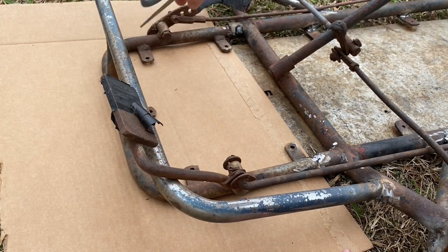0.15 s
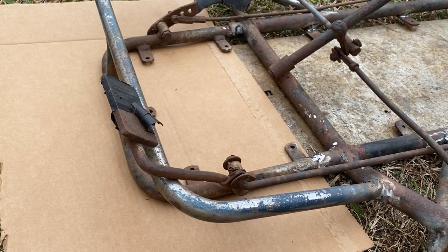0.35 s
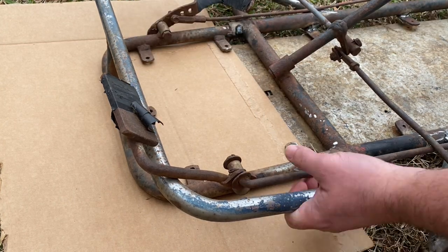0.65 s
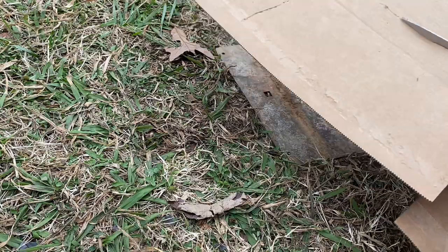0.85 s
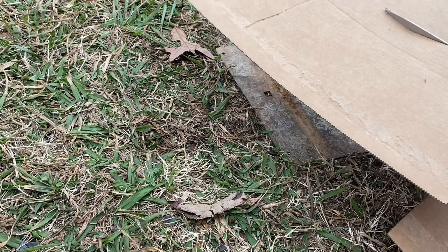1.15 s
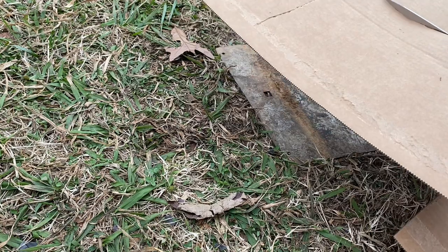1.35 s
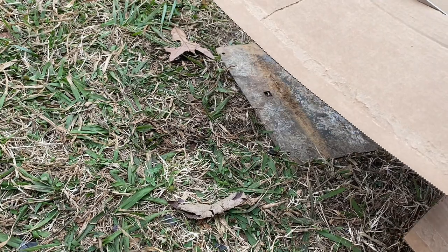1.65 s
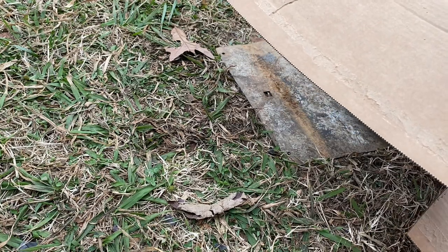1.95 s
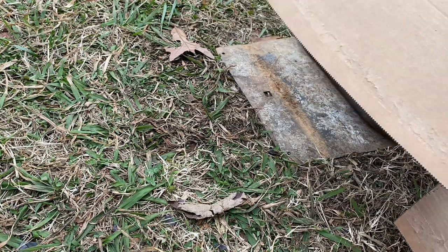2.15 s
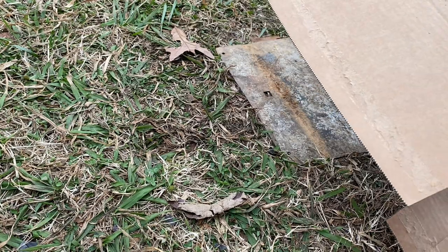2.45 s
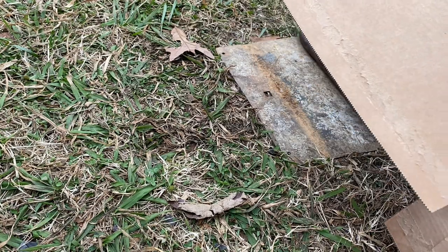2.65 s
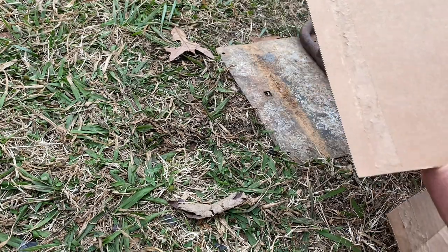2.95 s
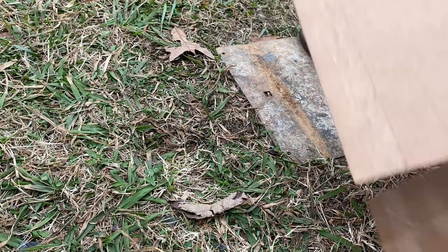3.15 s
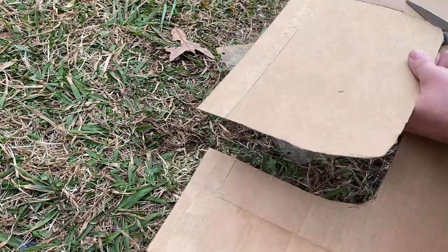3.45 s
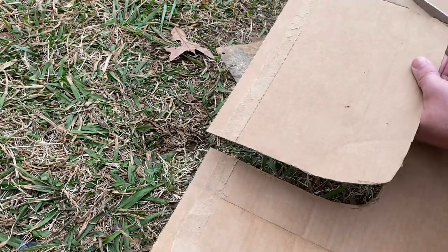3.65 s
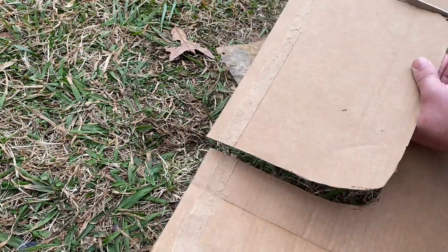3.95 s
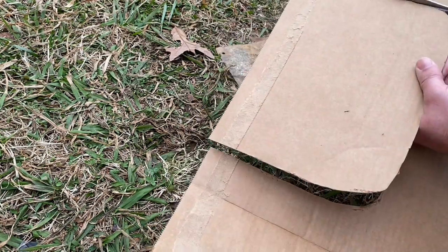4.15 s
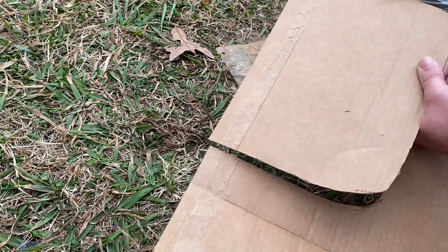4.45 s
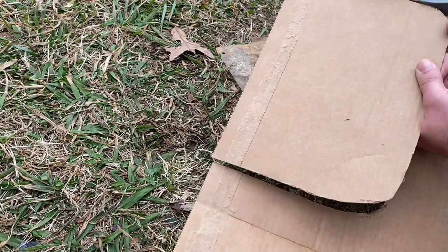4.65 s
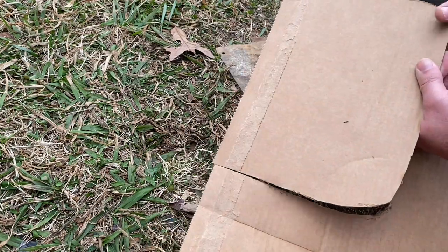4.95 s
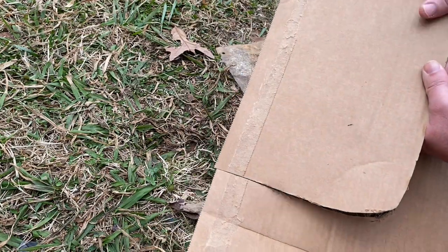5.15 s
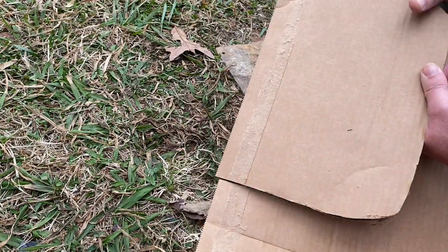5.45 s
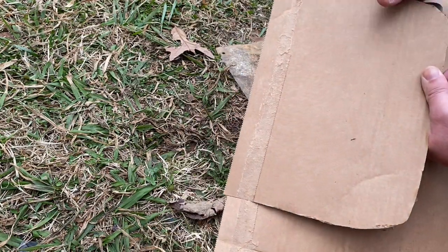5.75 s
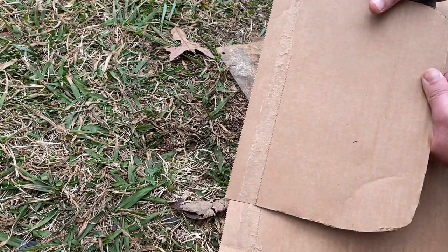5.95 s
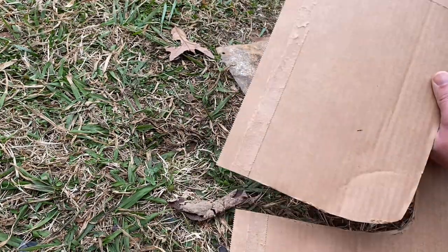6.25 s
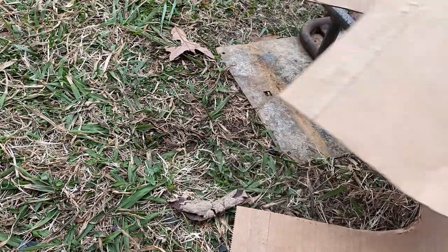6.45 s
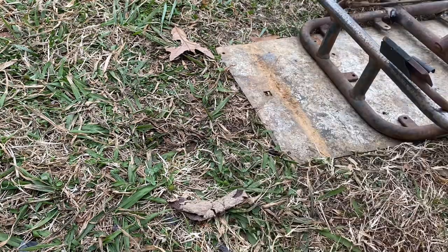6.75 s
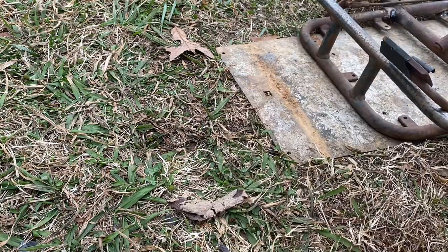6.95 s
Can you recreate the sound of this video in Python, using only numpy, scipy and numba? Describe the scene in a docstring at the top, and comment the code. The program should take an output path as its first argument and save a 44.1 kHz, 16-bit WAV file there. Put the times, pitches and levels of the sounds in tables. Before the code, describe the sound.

A close, dry stereo sound outdoors, with quiet air and a faint, wavering low hum that swells around 5.5 seconds. At the start a light scrape of steel on paper and a few thin, bright snaps, then dull handling thuds from 0.2 to 0.4. From about 0.8 the snips bite into corrugated cardboard: a strong crack cluster at 1.0, then sparser pops and fine blade ticks until 2.1. Between 2.25 and 3.6 the blades drag with short, dry rasps and scrapes, broken by firm cracks at 2.96 and 3.3. From 3.65 to 5.65 the crunches come in regular bursts, several pops per bite, louder and brighter, with papery sliding between. Weaker cracks at 5.9, then a last heavy, deeper crunch near 6.15. The sheet comes away with a brief scrape at 6.6 and soft low bumps from 6.75 to 7.1.

```python
"""A short slide of steel on paper and a faint hum in the outdoor air, a catch of the blade, then the first cracks:
scissors cut a sheet of corrugated cardboard outdoors, close to two microphone ports.
The flutes crack in short bursts, each a quick falling chirp that rings the strip under the blade.
Between bites the blades slide, tick and rasp in the slit as filtered random snaps and hiss,
and the held sheet flexes as a low noise and bumps in damped thuds."""
import sys
import numpy as np
from scipy import signal
from scipy.fft import rfft, irfft
from scipy.io import wavfile
from scipy.ndimage import uniform_filter1d
from numba import njit

SR = 44100
rng = np.random.default_rng(int(sys.argv[2]) if len(sys.argv) > 2 else 0)


def transcribe(signal):
    """Save signal, clipped to [-1, 1], as a 16-bit WAV file at the path in sys.argv[1]."""
    frames = np.atleast_2d(signal).T
    limited = np.clip(frames, -1, 1)
    pcm = np.round(limited * 32767).astype(np.int16)
    wavfile.write(sys.argv[1], SR, pcm)


N = 313418
HIT_SIZE = 4096  # samples in one short impact
# the strip of sheet under the blade rings with a main mode and a partner above it
STRIP_Q, PARTNER_RATIO = 14, 1.42


def undb(db):
    """Decibels to gain."""
    return 10 ** (np.asarray(db) / 20)


def curve(rows, axis=1):
    """One column of a timed table, at every sample."""
    rows = np.array(rows)
    return np.interp(np.arange(N) / SR, rows[:, 0], rows[:, axis])


def bins(size):
    """Frequencies of a spectrum in Hz, kept above zero."""
    return np.maximum(np.fft.rfftfreq(size, 1 / SR), 1)


def across(rows, hz, axis=1):
    """One column of a frequency table, joined on a log axis."""
    rows = np.array(rows)
    return np.interp(np.log(hz), np.log(rows[:, 0]), rows[:, axis])


def paint(x, colour):
    """Give a sound a colour of (Hz, dB) points, without shifting its phase."""
    size = x.shape[-1]
    return irfft(rfft(x) * undb(across(colour, bins(size))), size)


def resonance(hz, centre_hz, q):
    """Response of one damped mode."""
    return 1 / (1 + 1j * q * (hz / centre_hz - centre_hz / hz))


def unit(x, seconds=N / SR):
    """Scale a sound to the energy of rms 1 held for so long."""
    return x * np.sqrt(seconds * SR / np.sum(x ** 2))


def walk(rate):
    """Smooth random wandering with a spread near 1, from `rate` random steps a second."""
    step = max(int(SR / rate), 1)
    stairs = np.repeat(rng.standard_normal(N // step + 1), step)
    smooth = uniform_filter1d(uniform_filter1d(stairs, step), step)
    return 1.895 * smooth[:N]


def add(track, s, sound):
    """Mix a short sound in at a given time."""
    i = max(int(s * SR), 0)
    track[i:i + len(sound)] += sound[:N - i]


def gestures(rows, attack_s, release_s, sag_db):
    """Gain of movements: each rises, holds while its level sags by sag_db, and dies away; powers add."""
    power = np.zeros(N)
    for s, length_s, db in rows:
        size = int((attack_s + length_s + 8 * release_s) * SR)
        t = np.arange(size) / SR - attack_s
        rise = np.clip(1 + t / attack_s, 0, 1) ** 2
        hold = undb(db - sag_db * np.clip(t / length_s, 0, 1))
        fall = np.exp(-np.maximum(t - length_s, 0) / release_s)
        add(power, s - attack_s, (rise * hold * fall) ** 2)
    return np.sqrt(power)


def bending(hz, lag_s):
    """Bending waves are slower when low: the delay is lag_s at 1 kHz and goes as 1 / sqrt(f)."""
    return np.exp(-4j * np.pi * lag_s * np.sqrt(hz * 10 ** 3))


def strip(hz, ring_hz, wide_q=1.83, broad=0.3, sustain=3.6, partner=0.23):
    """The strip under the blade: a broad knock, and a narrow mode with its partner that ring on for a moment."""
    main_mode = resonance(hz, ring_hz, STRIP_Q)
    partner_mode = partner * resonance(hz, PARTNER_RATIO * ring_hz, STRIP_Q)
    knock = broad + resonance(hz, ring_hz, wide_q)
    return knock + sustain * (main_mode + partner_mode)


@njit
def moving_band(x, hz, q):
    """A resonance whose centre moves every sample."""
    y, band, low = np.empty(len(x)), 0., 0.
    for i in range(len(x)):
        g = np.tan(np.pi * hz[i] / SR)
        v = (band + g * (x[i] - low)) / (1 + g * (g + 1 / q))
        band, low, y[i] = 2 * v - band, low + 2 * g * v, v / q
    return y


# Colour of the open air around the ports. Each row: frequency in Hz, relative level in dB.
AIR_COLOUR = [(25, -49.5), (70, -33), (130, -15), (250, 9), (900, -8.5), (3200, -22.5), (8000, -29.5),
              (15500, -30)]


def air(level_db=-57, spread=0.47):
    """Quiet outdoor noise whose level wanders, slightly different at each port."""
    mid, side = (unit(paint(rng.standard_normal(N), AIR_COLOUR)) for _ in range(2))
    return undb(level_db + walk(13.0)) * (mid + spread * side * np.array([[1], [-1]]))


# Distant hum, before its random wavering. Each row: time in seconds, pitch in Hz, level in dB.
HUM = [(0, 279, -71), (1.4, 273.8, -54), (3.6, 281, -67), (4.4, 276, -54), (5.25, 281.9, -55.5),
       (5.45, 284, -45), (5.8, 283.5, -44.5), (6, 285, -57)]


def hum():
    """A distant hum, one sine that swells and wavers in pitch."""
    waver, swell_db = .008, 2.3  # pitch spread as a fraction, level spread
    pitch_hz = curve(HUM) * (1 + waver * walk(15))
    phase = 2 * np.pi * np.cumsum(pitch_hz) / SR
    return unit(np.sin(phase)) * undb(curve(HUM, axis=2) + swell_db * walk(9.3))


# Strokes of steel and paper sliding over the sheet.
# Each row: start in seconds, length in seconds, effort in dB before the gain of each sound it drives.
BLADE_STROKES = [(0, 0.15, -50.5), (.658, .012, -44), (1.455, 0.074, -52.5), (1.74, 0.035, -47),
                 (2.145, 0.077, -49), (2.5, 0.14, -48.5), (2.63, 0.118, -44), (3.07, 0.11, -43),
                 (3.3, .028, -41), (3.378, 0.017, -35.5), (3.44, 0.11, -49), (3.505, 0.05, -41),
                 (3.59, 0.13, -47.5), (3.975, 0.062, -46), (4.28, 0.053, -49), (4.49, .17, -47.5),
                 (4.76, 0.092, -48.5), (4.88, 0.18, -48), (5.205, 0.049, -47), (5.47, 0.12, -48),
                 (5.705, 0.16, -50), (6.025, 0.074, -47), (6.338, 0.1, -63.5), (6.575, 0.02, -42.5)]
# Light rubbing while the blades sit in the slit.
# Each row: start in seconds, length in seconds, effort in dB before the same gains.
LIGHT_RUBBING = [(0.882, 5.38, -57.5)]
# a stroke takes hold quickly, slackens as it goes and lets go
STROKE_ATTACK_S, STROKE_RELEASE_S, STROKE_SAG_DB = 0.0088, 0.013, 2


def blade_effort():
    """How hard the blades rub: strokes over a light steady contact."""
    return gestures(BLADE_STROKES + LIGHT_RUBBING, STROKE_ATTACK_S, STROKE_RELEASE_S, STROKE_SAG_DB)


# Colour of the blades' rubbing. Each row: frequency in Hz, relative level in dB.
SLIDE_COLOUR = [(200, -6.5), (500, -1.5), (950, 8), (3600, 2.5), (5800, -2), (8200, -1.5), (11000, -7.5),
                (15500, -10.5)]


def sliding(gain_db=-3.0):
    """Paper fibres catch and let go under the blade: fibres of each size tick on their own, over a hiss."""
    grain_rate, grain_db = 570, 4.1  # ticks a second for each size, mean excess of a tick
    hiss, catch_db = 1.1, 3.9  # hiss against ticks, spread of the quick level changes
    rub = 0
    for fibre_hz in 10 ** 3 * 2. ** np.arange(5):  # 1 to 16 kHz in octaves
        moments = rng.random(N) < grain_rate / SR
        direction = np.sign(rng.standard_normal(N))
        ticks = moments * direction * undb(grain_db * np.minimum(rng.exponential(size=N), 4))
        friction = (unit(ticks) + hiss * rng.standard_normal(N)) * undb(2 * walk(40))
        rub = rub + signal.lfilter(*signal.iirpeak(fibre_hz, 2, fs=SR), friction)
    return unit(paint(rub, SLIDE_COLOUR)) * blade_effort() * undb(gain_db + catch_db * walk(90))


def crackle(level_db=-4):
    """Single fibre bundles snap at random and ring the sheet, harder when the blade slides harder."""
    rate, size_db, spurt_s = 110, 4, .0007  # snaps a second, mean excess of a snap, decay
    hz = bins(N)
    snaps = (rng.random(N) < rate / SR) * undb(size_db * np.minimum(rng.exponential(size=N), 3))
    # each snap is a spurt of splinters that decays in under a millisecond
    envelope = signal.lfilter([1], [1, -np.exp(-1 / (spurt_s * SR))], snaps)
    spurts = envelope * rng.standard_normal(N)
    sheet = strip(hz, 1590) * bending(hz, 0.001498)
    return undb(level_db) * blade_effort() * unit(irfft(rfft(spurts) * sheet, N))


# The blade catching on the cut edge, once or in a run of fine ticks.
# Each row: start in seconds, length of the run in seconds (0 for one tick), typical level of a tick in dB.
CATCHES = [(.016, 0, -29.5), (1.165, 0.01, -33.5), (.941, 0, -37.5), (1.389, 0, -35), (1.514, 0, -28),
           (1.572, 0.064, -35), (1.872, .11, -39.5), (1.991, 0.012, -31.5), (2.188, 0, -39),
           (3.8348, 0, -33.5), (6.022, 0, -29.5), (6.132, 0, -26.5)]


def catches(ring_hz=1550, bright_hz=3200, lag_s=0.0018):
    """The blade catches and jumps at an uneven, slowing pace; each jump crushes a few fibres and rings the strip."""
    gap_s, slowing, scatter = .006, .05, .45  # first gap, its growth with elapsed time, log spread
    grit, grit_s = .4, .0013  # crushed fibres: amount, decay
    out, t, hz = np.zeros(N), np.arange(HIT_SIZE) / SR, bins(HIT_SIZE)
    for (s, length_s, db), chance in zip(CATCHES, rng.standard_normal((len(CATCHES), 20, 3))):
        elapsed = 0
        for pace, size, pitch in np.exp(scatter * chance):
            if elapsed <= abs(length_s):
                body = .5 + strip(hz, ring_hz * pitch ** .5)
                # dull above bright_hz and thin below 500 Hz
                body = body / (1 + 1j * hz / bright_hz) / (1 + 500 / (1j * hz))
                fibres = grit * rng.standard_normal(HIT_SIZE) * np.exp(-t / grit_s)
                push = rfft((t == 0) + fibres)
                tick = unit(irfft(push * body * bending(hz, lag_s)), 0.001)
                add(out, s + elapsed, undb(db) * size ** .5 * tick)
                elapsed += (gap_s + slowing * elapsed) * pace
    return out


# Colour of the sheet's ring. Each row: frequency in Hz, relative level in dB.
SHEET_COLOUR = [(40, -76.5), (120, -19), (250, 9.5), (1000, 8), (2200, 6), (3200, 0), (5000, -5.5),
                (9000, -13.5)]
# Colour of the snap through the air. Each row: frequency in Hz, relative level in dB.
SNAP_COLOUR = [(100, -48), (1500, -24), (3000, 2), (4600, -0.5), (7700, -2.5), (9500, -7.5), (15500, -17)]
# Flutes of the sheet cracking close to the ports, alone or several to a bite.
# Each row: time in seconds, ring level in dB, ring of the strip in Hz, treble snap relative to the ring in dB.
FLUTE_CRACKS = [(0.072, -30, 2770, 4), (0.099, -31, 3090, -5), (0.1091, -26, 3050, -6.5),
                (0.8373, -24, 1050, -13), (0.8653, -37, 1840, 3.5), (0.9877, -19.5, 1850, -14),
                (0.9976, -16, 1770, -13), (1.0104, -24, 1700, 1), (1.1949, -28, 1870, -0.2),
                (1.1983, -22.5, 1770, -16), (1.359, -22.5, 1880, -3), (1.6424, -27, 1360, -3),
                (1.6555, -29.5, 1144, 2.5), (1.682, -26.5, 1250, 0), (1.8331, -27.5, 1280, -22),
                (2.0406, -22.5, 1360, -8), (2.5559, -27, 1220, -12), (2.5698, -30.5, 970, 4),
                (2.964, -20.5, 1100, 0.5), (3.3115, -19, 1420, -11.1), (3.636, -22, 1710, -3.5),
                (3.6692, -16, 1730, -12), (3.8562, -20, 2270, -3), (3.8797, -14, 2310, -1),
                (3.8886, -17.5, 1580, -2.5), (4.1149, -18, 1710, -9.8), (4.1273, -26, 1710, 0.5),
                (4.1526, -21, 1550, -3.5), (4.1959, -23, 1660, -2.5), (4.4312, -17.5, 1670, -8.5),
                (4.4401, -30, 890, -2), (4.6564, -19.5, 3000, -11), (4.6659, -17.5, 1720, -4.5),
                (4.6754, -17, 1930, -9), (4.6988, -14.5, 1620, -4), (4.9025, -16.5, 2100, -10),
                (4.9169, -22.5, 1640, -13), (4.9423, -18.5, 2130, -6.5), (5.1128, -26, 2260, -14),
                (5.1253, -16.5, 1760, -14.7), (5.1357, -13, 1800, -23), (5.1507, -18.5, 2330, -2),
                (5.162, -19, 2580, -1.2), (5.3886, -22, 2620, -6.1), (5.3984, -13, 2470, -4.5),
                (5.618, -18, 2200, -3), (5.6274, -17, 990, -3.8), (5.6316, -22.5, 2180, 0.5),
                (5.897, -23.5, 2230, -10.5), (5.9052, -25, 2065, -12), (6.1459, -14, 1657, -21),
                (6.1526, -18.6, 1600, -12), (6.166, -11.5, 758, -21), (6.6562, -32.5, 970, -19),
                (6.8432, -33, 710, -13.5), (7.0344, -44, 710, -34)]


def cracks(echo=0.058, echo_s=0.0049, echo_hz=900, snap_db=0, lag_s=0.002115, bounce=0.42):
    """Each flute gives way in a spurt of fibre snaps and its liner follows a moment later, weaker;
    the strip rings and the sheet's edges send the low waves back."""
    tear_s, tear, snap_s = .0004, .15, .00045
    bounce_s, span_s = .0028, .002  # typical edge delay, span over which levels are set
    liner_db, liner_s = -10, .004  # typical strength and delay of the liner
    out, t, hz = np.zeros(N), np.arange(HIT_SIZE) / SR, bins(HIT_SIZE)
    sheet = undb(across(SHEET_COLOUR, hz)) * bending(hz, lag_s)
    noises = rng.standard_normal((len(FLUTE_CRACKS), 4, HIT_SIZE))
    for (s, db, ring_hz, treble_db), (fibres, edges, splinters, place) in zip(FLUTE_CRACKS, noises):
        edge_distance, spurt_length, liner_size, liner_lag = np.exp(place[:4] / 2)
        liner = undb(liner_db) * liner_size * np.exp(-2j * np.pi * hz * liner_s * liner_lag)
        twice = 1 + liner
        push = twice * rfft((t == 0) + tear * fibres * np.exp(-t / tear_s))
        # the nearest edge lies at another distance for every flute, so each crack has its own comb
        comb = 1 - bounce * np.exp(-2j * np.pi * hz * bounce_s * edge_distance)
        scatter = echo * edges * np.exp(-t / echo_s) * (1 - np.exp(-t / bounce_s))
        returns = rfft(scatter) / (1 + 1j * hz / echo_hz)
        ring = irfft(sheet * (push * comb * strip(hz, ring_hz) + 2 * returns))
        # the treble snap comes straight through the air, ahead of the ring
        fall = np.exp(-t / (snap_s * np.sqrt(spurt_length)))
        spurt = irfft(twice * rfft(fall * (1 - fall)))
        snap = paint(np.roll(splinters * spurt, shift=HIT_SIZE // 2), SNAP_COLOUR)
        add(out, s - .0013, undb(db) * unit(ring, span_s))
        snap_start = s - snap_s - HIT_SIZE / 2 / SR  # the snap sits mid-buffer
        add(out, snap_start, undb(db + treble_db + snap_db) * unit(snap, span_s))
    return out


# Colour of the flexing rumble. Each row: frequency in Hz, relative level in dB.
FLEX_COLOUR = [(30, -48), (70, -36), (160, -3.5), (250, 1.5), (800, -14), (2500, -42), (8000, -70)]
# The sheet bent in the hand. Each row: start in seconds, length in seconds, effort in dB before the gain.
BENDS = [(.2, 0.14, -46.5), (.7, 0.15, -49.5), (3.11, 0.086, -47), (5.3, 1.04, -52.5), (6.77, 0.069, -47),
         (7.01, 0.055, -41.5)]
# The sheet just held up. Each row: start in seconds, length in seconds, effort in dB before the gain.
HELD_UP = [(0.674, 1.738, -51.5), (2.85, 3.95, -52)]
BEND_ATTACK_S, BEND_RELEASE_S, BEND_SAG_DB = 0.12, 0.074, -0.5  # negative sag: the effort grows


def flexing(gain_db=-1.0, creak_db=-13, easy_db=-50):
    """The held sheet rumbles; when bent harder it also creaks higher up."""
    flutter_db, creak_growth = 2.5, .7  # spread of the rumble's level, extra power law of the creak
    effort = gestures(BENDS + HELD_UP, BEND_ATTACK_S, BEND_RELEASE_S, BEND_SAG_DB)
    rumble = unit(paint(rng.standard_normal(N), FLEX_COLOUR)) * undb(flutter_db * walk(45))
    slips = (rng.random(N) < 400 / SR) * rng.standard_normal(N)  # about 400 a second
    creak = unit(irfft(rfft(slips) * resonance(bins(N), 488, 1.1) ** 2, N))
    creak = creak * undb(creak_db) * (effort / undb(easy_db)) ** creak_growth
    return effort * undb(gain_db) * (rumble + creak)


# Dull handling bumps on the sheet. Each row: time in seconds, level in dB, centre of the thud's mode in Hz.
HANDLING_BUMPS = [(.223, -31, 505), (.283, -22.5, 474), (.308, -27, 435), (.343, -33, 440),
                  (0.375, -34.5, 450), (.412, -30, 623), (.544, -42, 520), (.698, -35, 383),
                  (0.8, -36.5, 790), (1.293, -35.5, 263), (1.799, -32.5, 306), (2.332, -34.5, 237),
                  (2.603, -39, 450), (2.797, -41, 380), (3.759, -44, 185), (4.127, -30, 300),
                  (5.237, -38.5, 244), (6.22, -37, 435), (6.263, -38, 263), (6.298, -36.5, 312),
                  (6.338, -43, 290), (6.76, -29, 314), (6.786, -29.5, 238), (6.821, -32, 214),
                  (6.842, -28.5, 270), (6.966, -40, 432), (7.018, -34, 600), (7.064, -30.5, 600),
                  (7.081, -27.5, 620)]


def bumps(lag_s=.0022, q=1.5, scuff=.14, scuff_s=.0055, softness=3.52):
    """Soft contacts push the whole sheet: a low, quickly damped thud with a little scuffing."""
    out, t, hz = np.zeros(N), np.arange(HIT_SIZE) / SR, bins(HIT_SIZE)
    sheet = bending(hz, lag_s) / (1 + (150 / hz) ** 4)
    grits = rng.standard_normal((len(HANDLING_BUMPS), HIT_SIZE))
    for (s, db, centre_hz), grit in zip(HANDLING_BUMPS, grits):
        contact = (t == 0) + scuff * grit * np.exp(-t / scuff_s)
        # a longer, softer push is both lower and duller
        push = rfft(contact) / (1 + (hz / centre_hz / softness) ** 4)
        thud = irfft(push * sheet * resonance(hz, centre_hz, q))
        add(out, s - .002, undb(db) * unit(thud, 0.008))
    return out


# Rasps of the blades dragging in the slit. Each row: start in seconds, length in seconds,
# level in dB before the gain, middle resonance of the strip in Hz, its partner's relative level in dB.
RASPS = [(2.258, 0.18, -43, 1590, -0.5), (2.662, 0.06, -36.5, 1584, -4), (2.707, 0.13, -45, 1616, -5),
         (2.877, 0.066, -41, 1590, -1), (3.043, 0.081, -36.5, 2300, -2), (3.163, 0.059, -37, 1680, -9),
         (3.249, 0.097, -48.5, 1390, -8), (3.43, 0.071, -40.5, 1580, -4), (3.573, 0.083, -41.5, 1630, -14),
         (4.367, 0.041, -40, 1650, -14)]


def rasps(slip_rate=450, hiss=0.085, gain_db=-3.5, scuff=0.093):
    """Pinched in the slit, a blade sticks and slips; two resonances of the sheet glide and rise with the pressure."""
    glide_octaves, bend, waver = .08, .04, .015  # all in octaves
    out, wander = np.zeros(N), waver * walk(40)
    for s, length_s, db, lower_hz, upper_db in RASPS:
        size = int(length_s * SR)
        along = np.linspace(0, 1, size)
        pressure = np.abs(np.sin(np.pi * along))
        moments = rng.random(size) < slip_rate / SR
        slips = rng.standard_normal(size) * (hiss + moments) * np.sqrt(pressure)
        glide = glide_octaves * (along - .5) + bend * (pressure - pressure.mean())
        hz = lower_hz * 2 ** (glide + wander[int(s * SR):][:size])
        lower = moving_band(slips, hz, STRIP_Q)
        upper = undb(upper_db) * moving_band(slips, PARTNER_RATIO * hz, STRIP_Q)
        broad = scuff * moving_band(slips, 2 * hz, 1.0)  # broad scuffing around the resonances
        add(out, s, undb(db + gain_db) * unit(lower - upper + broad, length_s))
    return out


# Treble of the cutting and rubbing. Each row: time in seconds, lift in dB.
TREBLE_LIFT = [(0, -0.5), (1.2, 5.5), (1.8, -6), (2.25, 9), (2.8, -15.5), (3.3, 0.5), (3.7, -4), (6.5, 5.5)]


def brighten(x, corner_hz=7000):
    """The treble above the corner rises and falls over time."""
    treble = irfft(rfft(x) / (1 + (corner_hz / bins(N)) ** 4), N)
    return x + treble * (undb(curve(TREBLE_LIFT)) - 1)


def surroundings(x):
    """Faint, short scatter from hands, sheet and lawn: a decaying noise tail for each port."""
    level_db, decay_s = -17, .003
    t = np.arange(HIT_SIZE) / SR
    tails = rng.standard_normal((2, HIT_SIZE)) * np.exp(-t / decay_s)
    scattered = [signal.fftconvolve(x, unit(tail, 1 / SR))[:N] for tail in tails]
    return undb(level_db) * np.array(scattered)


# The two close microphone ports. Each row: frequency in Hz, left minus right in dB,
# phase by which left leads in radians.
MICROPHONE_PORTS = [(100, .2, 0), (650, .5, -.1), (1500, -1.2, -.4), (2400, -2, -.4), (4400, -1.3, -.6),
                    (8100, 2.5, -.6), (15000, 3, .4)]


def scene(spread_db=-11):
    """The cutting reaches two close ports with a small lag and shading; the tearing spot keeps shifting between them,
    and the rubbing, spread along the blades, differs a little at each."""
    shift_db, shift_rate = 1.0, 80  # spread of the left-right shift, random steps a second
    cutting = brighten(sliding() + crackle() + cracks())
    near = hum() + cutting + catches() + flexing() + bumps() + rasps()
    hz, sign = bins(N), np.array([[.5], [-.5]])  # half of each difference to either port
    shading = undb(sign * across(MICROPHONE_PORTS, hz))
    lead = np.exp(1j * sign * across(MICROPHONE_PORTS, hz, axis=2))
    direct = irfft(rfft(near) * shading * lead, N) * undb(sign * shift_db * walk(shift_rate))
    wide_rubbing = 2 * sign * undb(spread_db) * brighten(sliding())
    return direct + wide_rubbing + surroundings(near) + air()


TOP_HZ = 15900


def record(dry):
    """The recorder cuts the top with a steep low-pass."""
    return signal.sosfilt(signal.ellip(10, .2, 80, TOP_HZ, fs=SR, output="sos"), dry)


dry = scene()
out = record(dry)
transcribe(out)
```